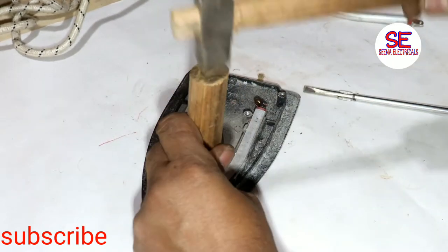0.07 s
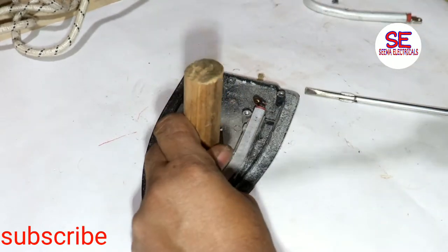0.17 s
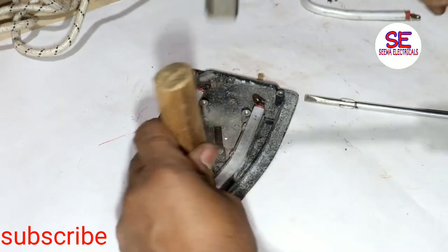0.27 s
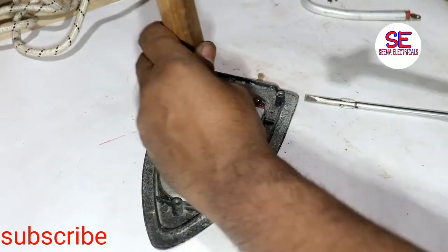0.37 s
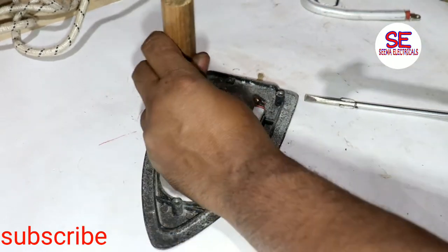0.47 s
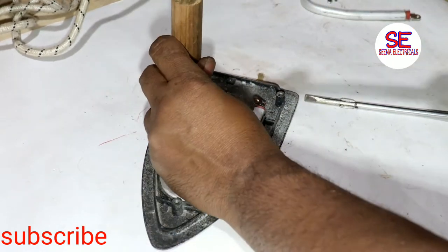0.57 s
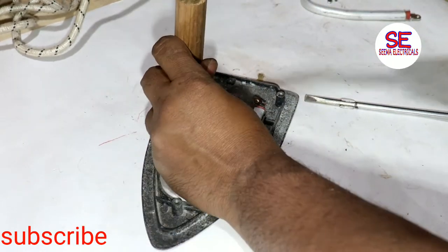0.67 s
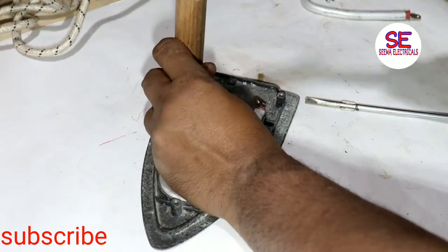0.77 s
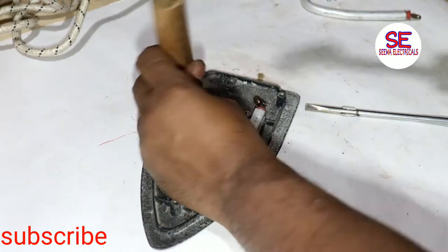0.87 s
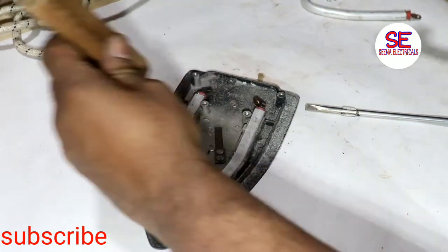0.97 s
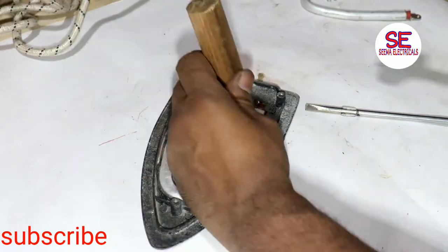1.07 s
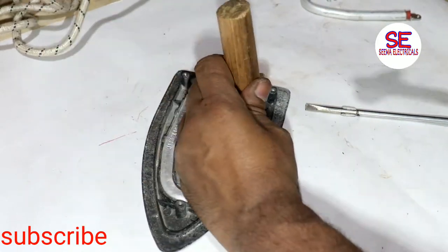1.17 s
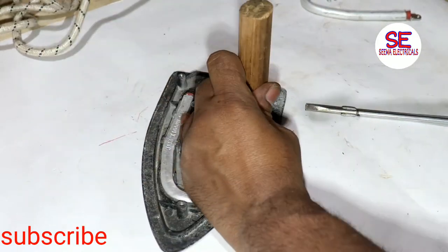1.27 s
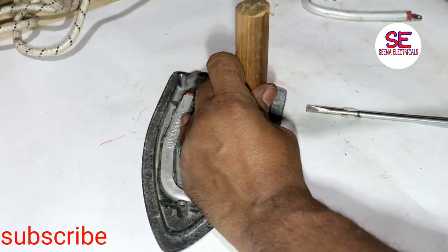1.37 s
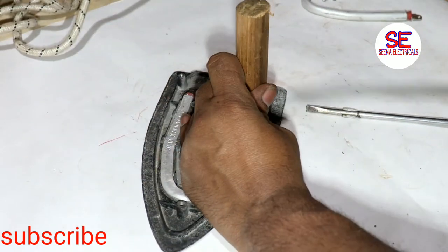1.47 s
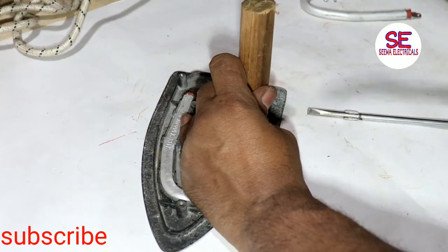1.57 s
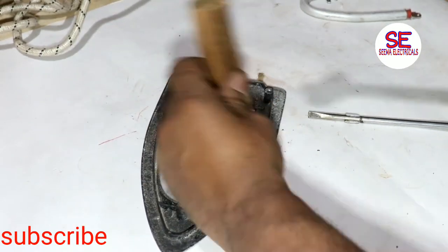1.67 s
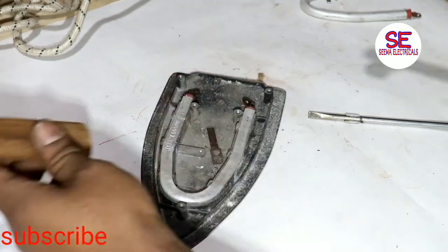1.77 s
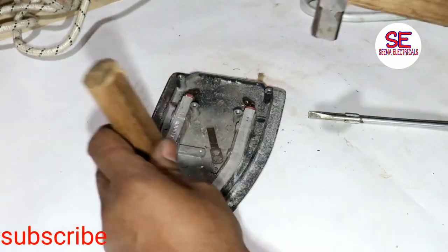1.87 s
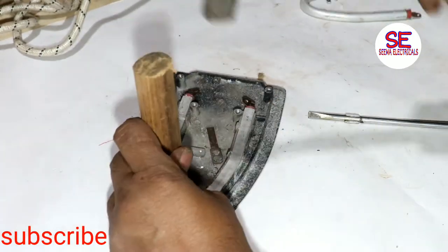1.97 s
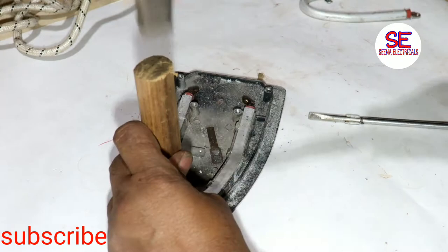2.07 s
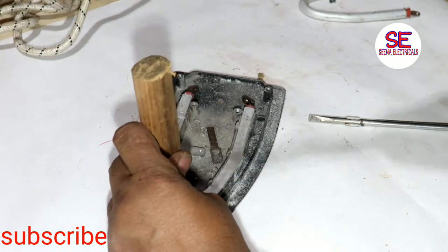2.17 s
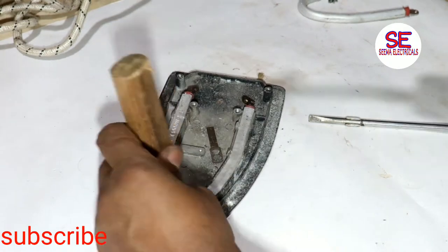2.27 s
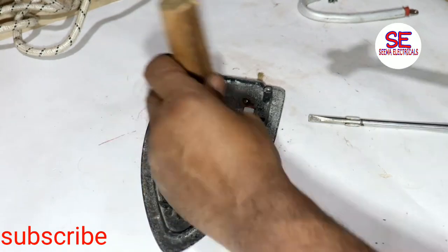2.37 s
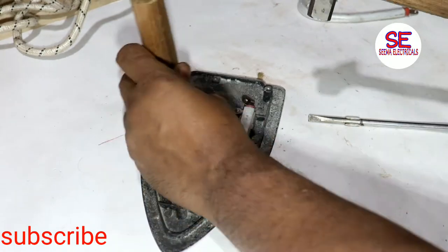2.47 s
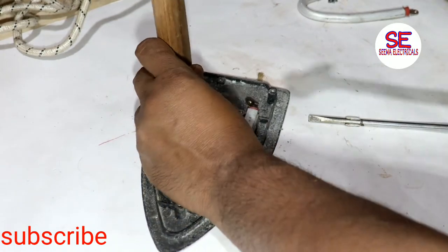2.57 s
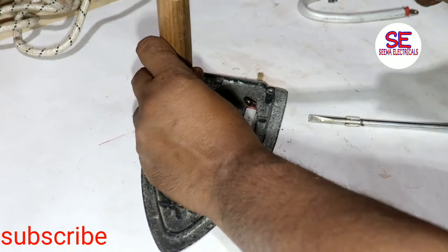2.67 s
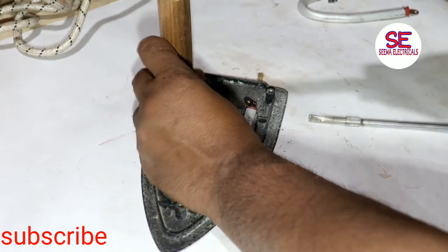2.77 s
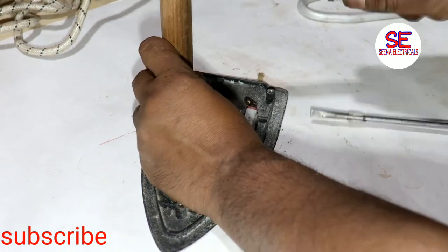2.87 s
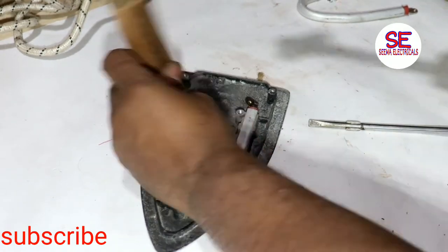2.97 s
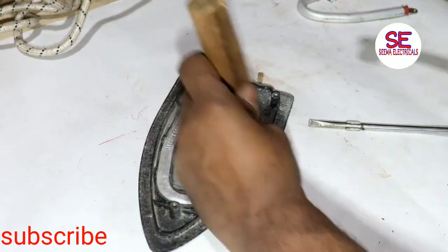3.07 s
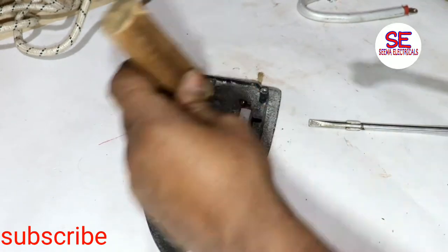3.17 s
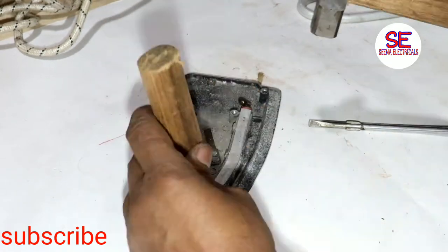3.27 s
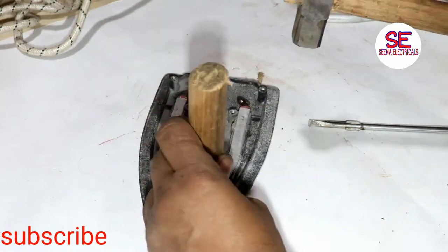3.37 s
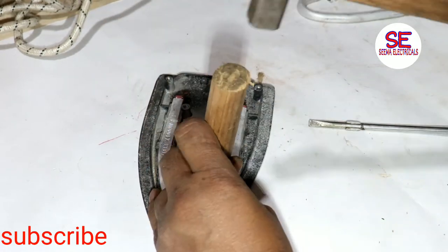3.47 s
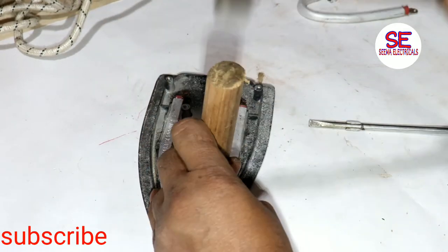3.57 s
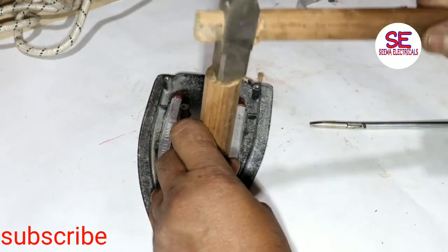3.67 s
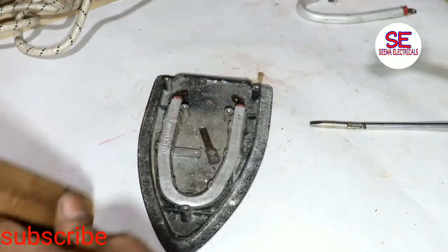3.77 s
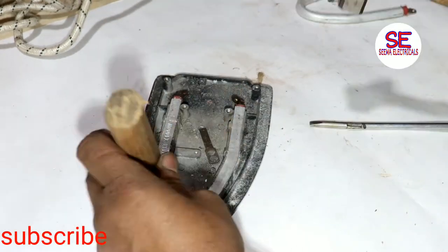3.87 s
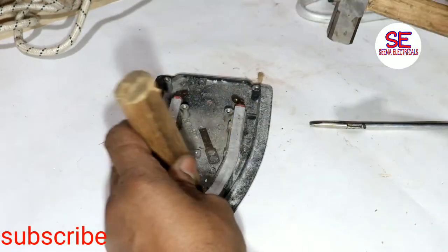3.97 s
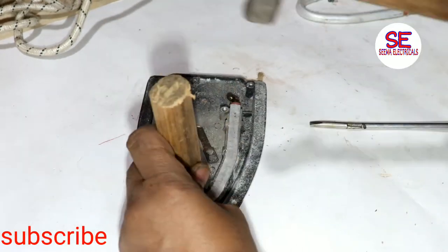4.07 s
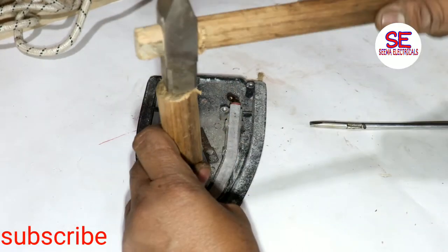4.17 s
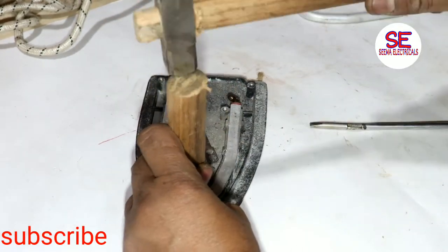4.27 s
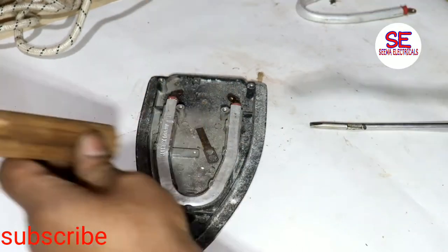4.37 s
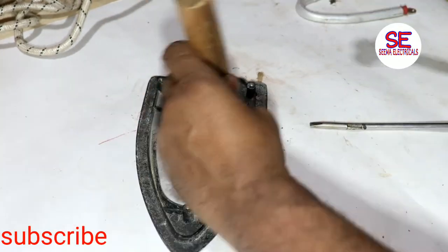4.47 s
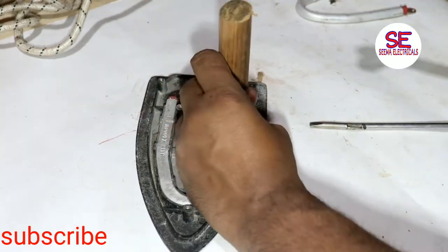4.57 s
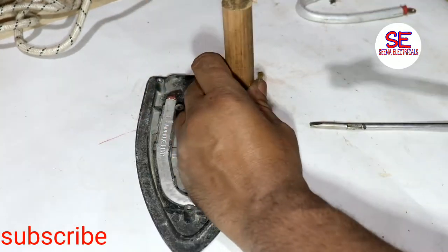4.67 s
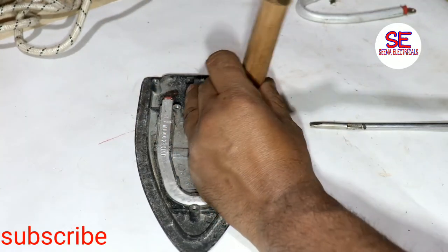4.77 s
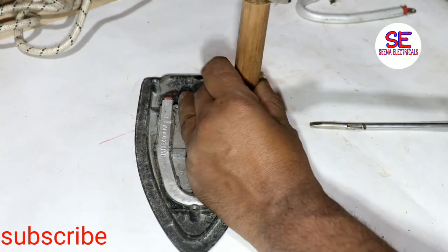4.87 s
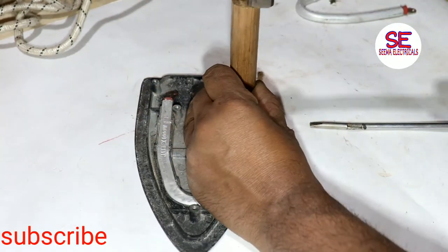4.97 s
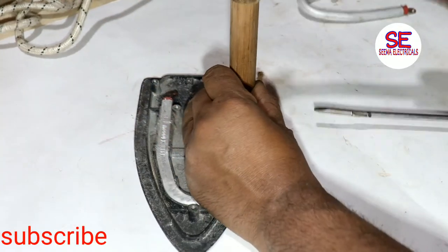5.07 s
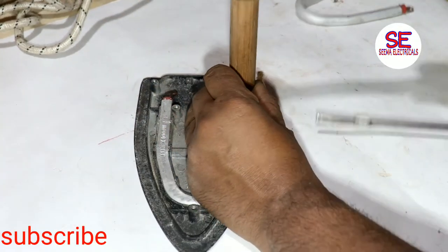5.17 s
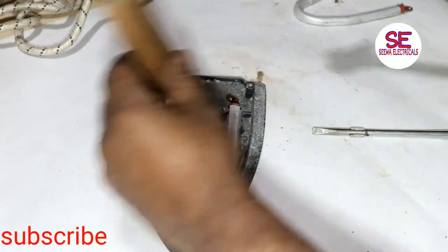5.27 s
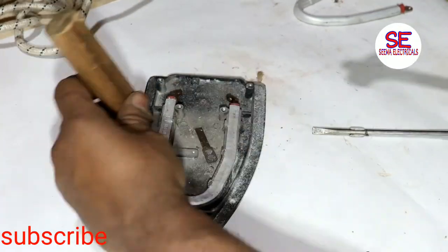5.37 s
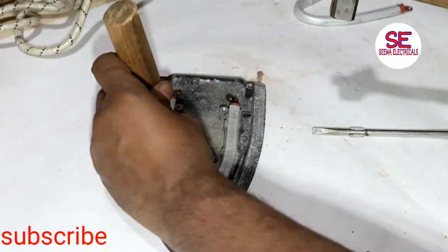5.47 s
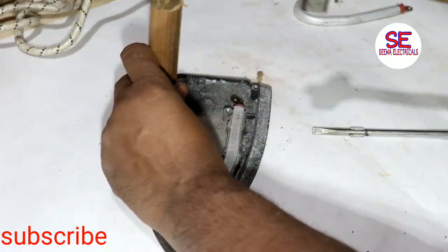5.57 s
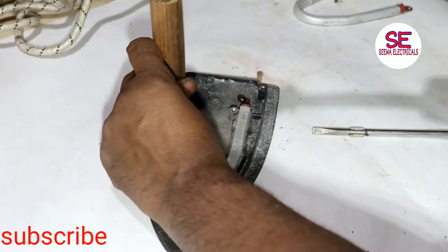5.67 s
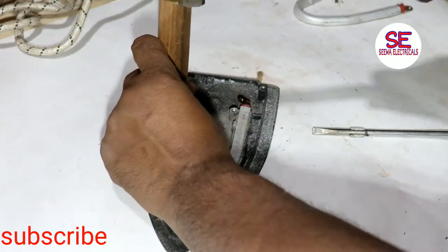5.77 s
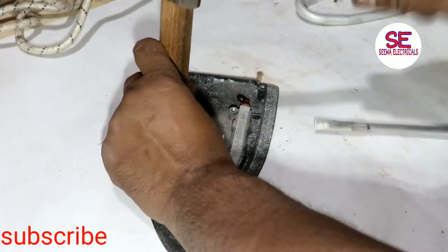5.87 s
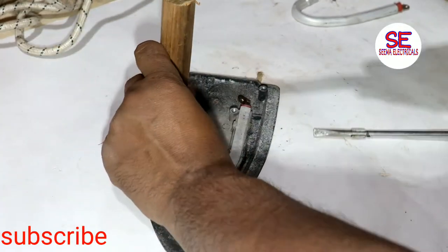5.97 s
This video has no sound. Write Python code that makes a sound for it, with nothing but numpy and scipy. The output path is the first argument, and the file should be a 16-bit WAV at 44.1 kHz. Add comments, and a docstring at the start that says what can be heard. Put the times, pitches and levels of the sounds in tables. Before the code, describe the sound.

A hammer strikes a wooden dowel held against the metal soleplate of a clothes iron on a workbench. Loud, short, clanky knocks arrive in groups of two to four, often led by a lighter tap. Between groups the plate scuffs dully, the dowel is set down softly, and skin or wood squeaks faintly. The close microphone distorts on the hard hits; the room is quiet and nearly dry.

```python
"""A faint dull scuff and a soft touch over room hush, then a light tap and hard, clipping hammer blows.
A hammer drives a hand-held wooden dowel on the metal soleplate of a clothes iron on a workbench.
Modes and dense noise make the ring; filtered noise makes touches, scuffs, rubs, chatter and hush.
Unsteady stacks of partials make faint squeaks; the room adds a very weak, short reverberation."""
import sys
import numpy as np
from scipy import signal
from scipy.fft import rfft, irfft
from scipy.io import wavfile
from scipy.ndimage import uniform_filter1d

SR = 44100
rng = np.random.default_rng(int(sys.argv[2]) if len(sys.argv) > 2 else 0)


def int16_out(signal):
    """Quantize to a 16-bit WAV file."""
    q = np.round(np.clip(np.atleast_2d(signal).T, -1, 1) * 32767)
    wavfile.write(sys.argv[1], SR, q.astype(np.int16))


N = 265041
RING_T = np.arange(SR // 5) / SR  # time axis of one contact sound, s


def undb(db):
    """Decibels to gain."""
    return 10 ** (np.asarray(db) / 20)


def unit(x):
    """Scale to rms 1."""
    return x / np.sqrt(np.mean(x ** 2))


def fade(t60_s):
    """Exponential ring-down, 60 dB in t60_s."""
    return np.exp(-np.log(1000) * RING_T / t60_s)


def lookup(points, hz):
    """Read (Hz, value) points on a log-frequency axis."""
    point_hz, value = np.transpose(points)
    return np.interp(np.log(np.maximum(hz, 1)), np.log(point_hz), value)


def noise(colour, size):
    """Noise of rms 1 with the given spectrum."""
    hz = np.fft.rfftfreq(size, 1 / SR)
    spectrum = rfft(rng.standard_normal(size)) * undb(lookup(colour, hz))
    return unit(irfft(spectrum, size))


def highpass(x, hz):
    """Second-order high-pass."""
    return signal.sosfilt(signal.butter(2, min(hz, SR / 3), "high", fs=SR, output="sos"), x)


def add(out, start_s, sound):
    """Mix a sound in at start_s."""
    start = int(start_s * SR)
    out[start:start + len(sound)] += sound[:len(out) - start]


def wander(size, hz):
    """Random drift of rms 1 that changes about hz times a second."""
    width = int(SR / hz)
    smooth = uniform_filter1d(rng.standard_normal(size), width)
    return unit(uniform_filter1d(smooth, width))


def slide_speed(slides):
    """Each slide (middle s, Gaussian width s, level dB) swells and fades as a Gaussian."""
    t = np.arange(N) / SR
    return sum(undb(db) * np.exp(-((t - middle_s) / width_s) ** 2 / 2) for middle_s, width_s, db in slides)


def hush(level_db=-66, cut_hz=70, drift_db=1.4, drift_hz=5):
    """Gently drifting room background, level set ahead of a cut of the deep bass."""
    # Room noise spectrum. Each row: frequency in Hz, relative density in dB per Hz.
    floor_colour = [(18, -49), (30, -17.5), (153, 2.5), (273, -17), (512, -1.5), (600, -13.5), (988, -14.5),
                    (1430, -4.5), (1810, -17), (2170, -8.5), (3310, -14), (4780, -16), (6550, -21),
                    (12300, -26.5), (16000, -30.5)]
    background = highpass(highpass(noise(floor_colour, N), cut_hz), cut_hz)
    return undb(level_db + drift_db * wander(N, drift_hz)) * background


def room(x, wet_db=-47.0, t60_s=.43):
    """Very weak, short reverberation: convolution with decaying noise of unit energy."""
    # Reverberation spectrum. Each row: frequency in Hz, relative density in dB per Hz.
    room_colour = [(40, -8), (150, 4), (400, 5), (900, -5), (1500, -5.5), (2300, -1), (4000, -5),
                   (8000, -8.5), (16000, -16.5)]
    t = np.arange(SR // 2) / SR
    tail = noise(room_colour, len(t)) * np.exp(-np.log(1000) * t / t60_s)
    return undb(wet_db) * signal.fftconvolve(x, tail / np.linalg.norm(tail))[:N]


def squeak(base_hz, waver, waver_hz=250, flicker_db=4, flicker_hz=90):
    """Thin, broken stack of partials over an unsteady, itself silent base frequency; rms 1."""
    # Partials. Each row: multiple of the base frequency, relative level in dB.
    partials = [(2, 4.5), (3, -3), (4, -7)]
    size = len(base_hz)
    unsteady_hz = base_hz * (1 + waver * wander(size, waver_hz))
    phase = 2 * np.pi * np.cumsum(unsteady_hz) / SR
    stack = np.zeros(size)
    for multiple, db in partials:
        flicker = undb(db + flicker_db * wander(size, flicker_hz))
        stack += flicker * np.sin(round(multiple) * phase)
    return unit(stack)


def squeaks(waver=.035):
    """Short, scratchy squeaks, each a single glide that swells and fades."""
    out = np.zeros(N)
    # Squeaks. Each row: start in seconds, length in seconds, base frequency at start in Hz,
    # base frequency at end in Hz, level in dB.
    glides = [(0.514, .1, 2664, 2330, -65), (0.92, .05, 2420, 2330, -64.5),
              (1.024, 0.052, 2200, 2650, -63.5), (1.205, .11, 1220, 1380, -61),
              (1.25, 0.093, 1150, 1087, -61), (2.049, 0.054, 2340, 3620, -67.5),
              (3.058, .048, 2600, 2960, -67), (3.981, 0.048, 2455, 2990, -72),
              (5.069, 0.1, 2720, 2250, -68), (5.432, .1, 2430, 2460, -72), (5.763, 0.089, 1400, 1650, -65)]
    for start_s, length_s, from_hz, to_hz, db in glides:
        size = int(length_s * SR)
        base_hz = np.linspace(from_hz, to_hz, size)
        add(out, start_s, undb(db) * np.hanning(size) * squeak(base_hz, waver))
    return out


def squeal(level_db=-65.5, attack_s=0.034, release_s=0.013):
    """One drawn-out faint squeal that swells, holds and stops."""
    # Path of the squeal. Each row: time in seconds, base frequency in Hz.
    path = [(4.84, 2802), (4.908, 2984), (4.972, 2721), (5.054, 2882), (5.07, 2724)]
    t = np.arange(N) / SR
    time_s, base_hz = np.transpose(path)
    swell = (t - time_s[0]) / attack_s
    stop = (time_s[-1] - t) / release_s
    envelope = np.clip(np.minimum(swell, stop), 0, 1)
    return undb(level_db) * envelope * squeak(np.interp(t, time_s, base_hz), waver=.011)


def rubs(grain_db=4.0, grain_hz=160):
    """Skin catches and slips on the wood as the grip shifts: faint, grainy swells."""
    # Grip shifts. Each row: middle in seconds, Gaussian width in seconds, level in dB.
    shifts = [(.49, .035, -62), (.685, 0.021, -62.5), (1.25, 0.041, -63), (3.38, 0.035, -71.5),
              (5.781, .045, -64)]
    # Dry skin on wood. Each row: frequency in Hz, relative density in dB per Hz.
    rub_colour = [(400, -24.5), (1400, -4), (2800, 0.5), (5000, -3), (8000, -11), (16000, -17)]
    grain = undb(grain_db * wander(N, grain_hz))
    return slide_speed(shifts) * unit(grain * noise(rub_colour, N))


def scuffs(grain_db=3, grain_hz=110, grit_db=-9, grit_hz=600):
    """Short, dull slides of the plate that catch and slip unevenly; faster ones are grittier."""
    # Slides. Each row: middle in seconds, Gaussian width in seconds, level in dB before grain and grit.
    slides = [(0.024, .05, -54), (0.454, .05, -61), (0.985, .018, -46.5), (1.763, .035, -51.5),
              (2.355, .027, -56.5), (3.14, .04, -50.5), (3.272, .015, -63), (3.539, 0.024, -53),
              (4.016, 0.034, -55.5), (4.444, 0.031, -43)]
    # Plate on bench. Each row: frequency in Hz, relative density in dB per Hz.
    scuff_colour = [(40, -22), (130, -1), (270, 2.5), (500, -5), (800, -14), (1300, -20.5), (3000, -34.5),
                    (16000, -58)]
    speed = slide_speed(slides)
    bright = unit(highpass(noise(scuff_colour, N), grit_hz))
    grit = undb(grit_db) * np.sqrt(speed / speed.max()) * bright
    grain = undb(grain_db * wander(N, grain_hz))
    return speed * grain * (noise(scuff_colour, N) + grit)


def tick(hz, t60_s, top_hz=13000):
    """Brief crack of a contact: decaying noise between hz and top_hz."""
    soft = signal.butter(2, min(top_hz, SR / 3), fs=SR, output="sos")
    crack = signal.sosfilt(soft, highpass(rng.standard_normal(len(RING_T)), hz))
    return crack * fade(t60_s)


def touches(treble_db=6, note_hz=1050, rise_s=.0005):
    """The dowel's end is set down softly on the plate: one dull note and a small edge."""
    out = np.zeros(N)
    # Touches. Each row: start in seconds, peak in dB, edge level in dB before treble_db.
    contacts = [(.038, -27.5, -17), (.592, -39, -20), (.712, -35, 8), (1.188, -38, -19.5),
                (1.222, -43.5, -13), (1.979, -38, -18), (2.599, -52.5, -15), (3.448, -37, -24),
                (4.087, -39.5, -25.5), (4.665, -50, -25), (4.743, -37, -23), (4.88, -43.5, -11),
                (4.921, -22.5, 0), (5.015, -47, -11), (5.586, -46, -22), (5.758, -43.5, -15)]
    # Dull body of a touch. Each row: frequency in Hz, relative density in dB per Hz.
    body_colour = [(100, -44.5), (300, -5), (650, -12), (1050, -2.5), (1300, -14), (1550, -8), (2500, -21),
                   (5000, -33), (16000, -49.5)]
    envelope = fade(.042) * (1 - np.exp(-RING_T / rise_s))
    note = np.sin(2 * np.pi * note_hz * RING_T)
    for start_s, peak_db, edge_db in contacts:
        body = noise(body_colour, len(RING_T)) + note
        edge = undb(edge_db + treble_db) * tick(hz=2463, t60_s=.06, top_hz=5530)
        knock = (body + edge) * envelope
        add(out, start_s, undb(peak_db) * knock / np.abs(knock).max())
    return out


def chatter(t60_s=0.041, span=1.4):
    """Single small rebounds of the plate, each a band of decaying noise from hz to span * hz."""
    out = np.zeros(N)
    # Rebounds. Each row: start in seconds, peak in dB, low band edge in Hz.
    rebounds = [(.335, -21, 1500), (1.658, -25, 3500), (2.242, -23.5, 3000), (5.1897, -17, 3500),
                (5.217, -29, 1400), (5.288, -18, 1400)]
    for start_s, peak_db, hz in rebounds:
        rebound = tick(hz, t60_s, top_hz=span * hz)
        add(out, start_s, undb(peak_db) * rebound / np.abs(rebound).max())
    return out


def modal_ring(spot, detune=0.0057, scatter_db=1.0, phase_spread_rad=0.68):
    """Strong modes; the spot under the dowel sets their balance, pitches vary a little from blow to blow."""
    # Modes of dowel and plate. Each row: nominal frequency in Hz, relative level in dB,
    # dB gained per unit of spot.
    modes = [(152,-21,1), (315,-12,-5), (417.5,-4,0), (544,-9,-4), (854,-10,2.3), (910.5,-1.5,1.5),
             (1001,0,-2.5), (1086,-4.5,-6), (1195.3,-1.5,-2.5), (1440,-10,7), (1499.3,2.5,-4),
             (1589.3,-5,-1), (1682,-3.5,6.5), (2037,1.5,-1.5), (2118,-2.5,0), (2312,-10.5,5), (2489,-4,4),
             (2576,-11,1), (2886,-7.5,7), (2951,-7,-4), (3400,-10,-0.5), (3381,-10.5,3.5),
             (3682,-11.5,-1.5), (4037,-8,0.5), (4450,-13.5,1.5), (4588,-12,1.5), (4940,-11.5,-1.5),
             (5430,-16,7.5), (5850,-17,-2), (6300,-18.5,2.5)]
    hz, db, spot_db = np.transpose(modes)
    chance = rng.standard_normal((len(hz), 3)).T
    hz = hz * (1 + detune * chance[0])
    gain = undb(db + spot * spot_db + scatter_db * chance[1])
    phase = phase_spread_rad * chance[2]
    waves = np.sin(2 * np.pi * hz[:, None] * RING_T + phase[:, None])
    return gain @ waves / np.sqrt(np.sum(gain ** 2) / 2)


def brighten(x, db_per_octave, corner_hz=1200, limit_hz=5000):
    """A harder, shorter contact feeds the upper modes more; overall level is kept."""
    size = 2 * len(x)
    hz = np.fft.rfftfreq(size, 1 / SR)
    octaves = np.log2(np.hypot(1, hz / corner_hz) / np.hypot(1, hz / limit_hz))
    y = irfft(rfft(x, size) * undb(db_per_octave * octaves))[:len(x)]
    return y * np.std(x) / np.std(y)


def hammer(drive_db=10.0, dense_db=-7, dense_t60_s=0.05, t60_s=0.028, rise_s=0.00049,
           slap_db=-7, slap_s=0.0037, rattle_db=-20, rattle_t60_s=.085, rattle_flicker_db=3,
           rattle_dense_db=-7, tick_db=-6.5, tick_slope=0.46, mic_cut_hz=190):
    """Blows crack on the dowel's head and ring the hand-damped plate; hard ones make it slap and rattle."""
    out = np.zeros(N)
    size = len(RING_T)
    # Blows. Each row: start in seconds, level in dB before drive_db, brightness in dB per octave.
    blows = [(.1368, -15.5, -7), (.2283, -4.5, 3.5), (.3064, -5, 6), (.8, -6.5, 0), (.8835, -6.5, 3),
             (1.4314, -8.5, -5), (1.5409, -14.5, 5), (1.6124, -5, 4.5), (1.6932, -6, 4), (2.1389, -7, -0.3),
             (2.2193, -5, 2.5), (2.292, -5, 6.5), (2.7773, -22, -7.5), (2.8745, -7, 0.8),
             (2.9656, -6.5, 4.2), (3.6126, -18, -2.5), (3.7156, -4.5, 5.5), (4.2354, -19.5, -5.5),
             (4.3425, -6, 0.85), (5.0692, -14.5, 0.5), (5.1643, -4.5, 7), (5.254, -4, 5),
             (5.8609, -15, -0.5), (5.9612, -5, 7)]
    # Dowel positions, one per group. Each row: from time in seconds, spot on the plate from -1 to 1.
    places = [(0, 1), (.6, -0.74), (1.2, 0.15), (2, 0.99), (2.6, -0.95), (3.4, 0.61), (4.1, 0.94),
              (4.8, -0.17), (5.6, -0.57)]
    # Dense ring of plate and bench between modes. Each row: frequency in Hz, relative density in dB per Hz.
    dense_colour = [(30, -38), (130, -21), (180, -25), (270, 0), (420, -2), (680, -4), (1000, 3.5),
                    (2200, -3.5), (3500, -4), (6500, -15.5), (10000, -19.5), (16000, -30.5)]
    attack = 1 - np.exp(-RING_T / rise_s)
    strike = attack * fade(t60_s)
    slap = np.interp(RING_T - slap_s, RING_T, strike, left=0)
    for start_s, db, bright_db in blows:
        spot = [place for since_s, place in places if since_s <= start_s][-1]
        lift = undb(min(db + 3.5, 0))  # light taps barely lift the plate
        # the plate drops back on the bench, which tops up its ring
        ring = modal_ring(spot) * (strike + lift * undb(slap_db) * slap)
        dense = undb(dense_db) * noise(dense_colour, size) * attack * fade(dense_t60_s)
        # as it settles, uneven small contacts keep the same modes going
        loose = modal_ring(spot, detune=0.012) + undb(rattle_dense_db) * noise(dense_colour, size)
        flicker = undb(rattle_db + rattle_flicker_db * wander(size, 150))
        rattle = lift * flicker * loose * fade(rattle_t60_s)
        # the brighter the ring, the weaker the separate crack
        crack = undb(tick_db - tick_slope * bright_db) * tick(hz=6000, t60_s=0.014)
        blow = brighten(ring + dense, bright_db) + attack * rattle + crack
        add(out, start_s, undb(db + drive_db) * blow)
    return highpass(highpass(out, mic_cut_hz), mic_cut_hz / 2)  # the microphone picks up little bass


def scene():
    """Bench work over the faint hush of the room."""
    work = squeaks() + squeal() + rubs() + scuffs() + touches() + chatter() + hammer()
    return (work + room(work) + hush())[None]


def record(dry, top_hz=15750):
    """Hard blows overload the close microphone and clip flat; the top is cut."""
    clipped = np.clip(dry, -.98, .98)
    lowpass = signal.firwin(255, top_hz, fs=SR)
    return signal.fftconvolve(clipped, lowpass[None], mode="same")


dry = scene()
out = record(dry)
int16_out(out)
```